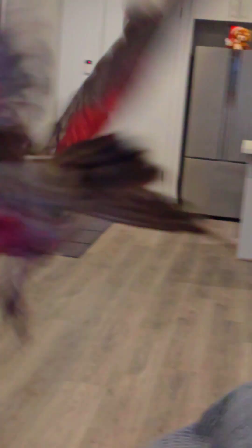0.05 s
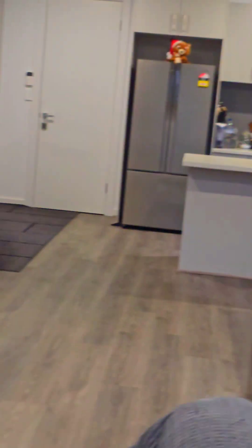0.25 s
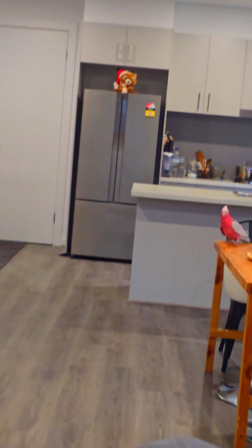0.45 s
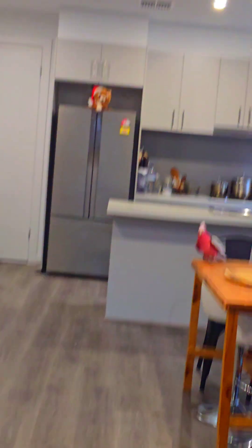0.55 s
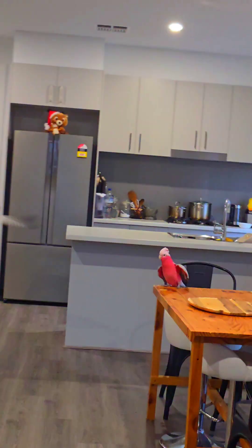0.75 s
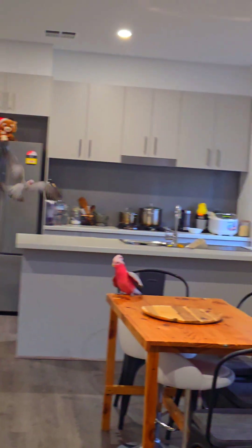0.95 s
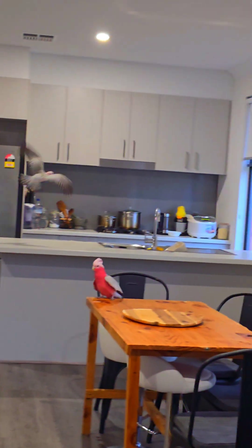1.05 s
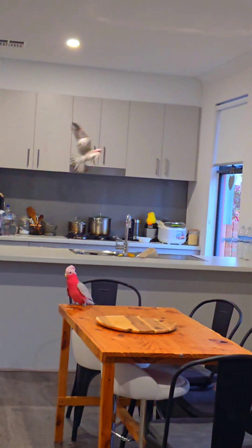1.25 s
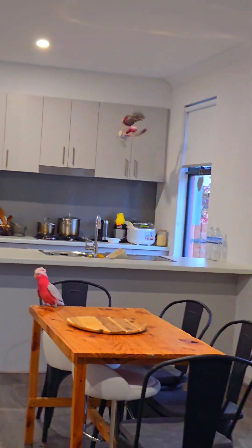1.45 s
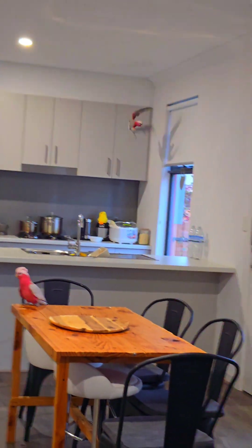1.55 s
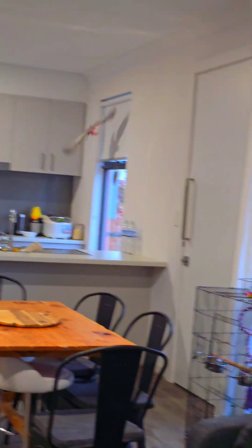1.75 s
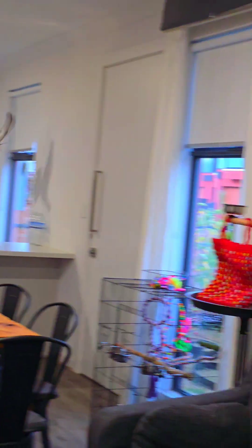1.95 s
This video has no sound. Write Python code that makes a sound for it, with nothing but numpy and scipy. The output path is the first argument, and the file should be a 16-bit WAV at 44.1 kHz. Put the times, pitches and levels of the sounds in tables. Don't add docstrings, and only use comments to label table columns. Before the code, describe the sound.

Two cockatoos shriek piercing, whistling calls in a reverberant kitchen as one takes off close by

```python
import sys
import numpy as np
from scipy import signal
from scipy.fft import rfft, irfft
from scipy.io import wavfile
from scipy.ndimage import uniform_filter1d, minimum_filter1d

SR = 44100
rng = np.random.default_rng(int(sys.argv[2]) if len(sys.argv) > 2 else 0)


def dump(signal):
    limited = np.clip(np.atleast_2d(signal).T, -1, 1)
    pcm = np.round(limited * 32767).astype(np.int16)
    wavfile.write(sys.argv[1], SR, pcm)


def makeup_ratio(level_db):
    decades = np.asarray(level_db, float) / 20
    return 10 ** decades


N = 88200
LEAD = SR // 5
LONG = N + LEAD
TIME_S = (np.arange(LONG) - LEAD) / SR
SIDES = np.array([[.5], [-.5]])


def evened(x):
    return x / np.sqrt(np.mean(x ** 2) + 1e-20)


def read(points, hz):
    f, value = np.transpose(points)
    return np.interp(np.log(hz + 1), np.log(f + 1), value)


def add(mix, start_s, sound):
    part = mix[LEAD + round(start_s * SR):][:len(sound)]
    part += sound[:len(part)]


def noise(colour, channels):
    hz = np.fft.rfftfreq(LONG, 1 / SR)
    white = rng.standard_normal((channels, LONG))
    return evened(irfft(rfft(white) * makeup_ratio(read(colour, hz)), LONG))


def drift(grain_s):
    size = max(round(grain_s * SR), 2)
    once = uniform_filter1d(rng.standard_normal(LONG), size)
    return evened(uniform_filter1d(once, size))


def shape(length_s, rise_s=.009, fall_s=.008):
    t = np.arange(0, length_s + fall_s, 1 / SR)
    ramp = np.minimum(t / rise_s, (t[-1] - t) / fall_s)
    return np.sin(np.pi / 2 * np.clip(ramp, 0, 1)) ** 2


def swell(middle_s, length_s):
    return np.exp(-2 * (TIME_S - middle_s) ** 2 / (length_s / 2) ** 2)


def puffs(events):
    out = np.zeros(LONG)
    for start_s, length_s, db in events:
        add(out, start_s, makeup_ratio(db) * shape(length_s))
    return out


def voice(notes, overtones_db, wobble=.015):
    bend, dulling_db, shimmer, tremble_s = 0.676, -1.5, .5, .003
    out, sway, flicker = np.zeros(LONG), drift(tremble_s), drift(tremble_s)
    for start_s, length_s, first_hz, last_hz, db in notes:
        env = shape(length_s)
        at = LEAD + round(start_s * SR) + np.arange(len(env))
        along = np.linspace(0, 1, len(env))
        glide_hz = first_hz + (last_hz - first_hz) * along ** bend
        phase = 2 * np.pi * np.cumsum(glide_hz * (1 + wobble * sway[at])) / SR
        tone = np.zeros(len(env))
        for k, overtone_db in enumerate(overtones_db):
            tone += makeup_ratio(overtone_db + k * dulling_db * along) * np.sin((k + 1) * phase)
        add(out, start_s, makeup_ratio(db) * env * (1 + shimmer * flicker[at]) * tone)
    return out


# start in seconds, length in seconds, first pitch in Hz, last pitch in Hz, level in dB.
PERCHED = [(-.12, 0.049, 3880, 4070, -38), (.234, 0.068, 4886, 4919, -17.5), (.3, 0.049, 4930, 4884, -33),
           (.422, 0.056, 3400, 3767, -21.5), (.456, 0.018, 5120, 5240, -21.5),
           (.478, 0.052, 4840, 4736, -19), (.512, 0.024, 4800, 5000, -22.5),
           (.543, 0.029, 4900, 4960, -18.5), (.566, 0.0376, 4990, 5070, -20),
           (.706, 0.029, 3503, 3818, -20), (.734, 0.036, 3830, 4090, -12.5), (.775, 0.047, 4800, 4880, -14),
           (.822, 0.041, 4880, 4992, -16), (1.032, 0.0362, 3620, 3880, -17.5),
           (1.066, 0.051, 3860, 4000, -15.5), (1.511, 0.016, 3688, 3860, -19.5),
           (1.52, 0.029, 3810, 3875, -13.5), (1.557, 0.053, 3887, 4228, -18.5),
           (1.57, 0.022, 5135, 5137, -23), (1.61, 0.043, 5158, 5070, -31.5)]
PERCHED_OVERTONES = [1, -12, -21.5, -29]


def perched_whistles():
    return voice(PERCHED, PERCHED_OVERTONES)


# start in seconds, length in seconds, level in dB.
RASPS = [
    (0.134, 0.03, -13.5),
    (0.194, 0.067, -27.5),
    (0.401, 0.1023, -24.5),
    (0.493, 0.2, -37.5),
    (0.672, 0.12, -29),
    (0.797, 0.085, -37.5),
    (0.993, 0.0525, -33),
    (1.086, 0.056, -44),
    (1.464, 0.057, -29.5),
    (1.54, 0.051, -29),
]
# frequency in Hz, level in dB.
RASP_COLOUR = [(500, -13), (1400, -15.5), (2000, -19.5), (2650, -7), (3200, 5), (4600, 3), (6300, -2.5),
               (9500, -4), (10900, -31), (12200, -16), (13600, -22), (15000, -19.5)]


def rasps():
    breath = np.zeros(LONG)
    for start_s, length_s, db in RASPS:
        add(breath, start_s, makeup_ratio(db) * shape(length_s, rise_s=0.047))
    grit = makeup_ratio(2.4 * drift(0.00054))
    return breath * noise(RASP_COLOUR, channels=1)[0] * grit


# start in seconds, length in seconds, first pitch in Hz, last pitch in Hz, level in dB.
FLYING = [(-.12, 0.053, 4940, 4870, -36.5), (-.09, 0.024, 6110, 6300, -32.5),
          (.195, 0.019, 3038, 3136, -11), (.445, 0.019, 2814, 2970, -25), (.555, 0.074, 2883, 3070, -35),
          (.65, 0.027, 3900, 4080, -29), (.71, 0.013, 2780, 3120, -27.5), (.79, 0.035, 5430, 5330, -29),
          (.71, 0.03, 4475, 4630, -28.5), (1.022, 0.0578, 2930, 3110, -29.5),
          (1.484, 0.024, 2700, 3080, -27.5), (1.503, 0.03, 3000, 3271, -17.5),
          (1.535, 0.0607, 3171, 3062, -25.5), (1.478, 0.016, 2990, 3480, -29.5),
          (1.488, 0.039, 5000, 5600, -40.5), (1.07, 0.048, 3080, 3120, -37.5)]
FLYING_OVERTONES = [1, -10, -12, -19]


def flying_whistles():
    return voice(FLYING, FLYING_OVERTONES)


# start in seconds, length in seconds, first pitch in Hz, last pitch in Hz, level in dB.
FIRST_CRY = [
    (.15, 0.0092, 4000, 3720, -26.5),
    (.158, 0.043, 3520, 3730, -12),
    (.2, 0.0331, 3700, 3950, -11.5),
]
FIRST_CRY_OVERTONES = [1, -8.5, -22, -28]


def first_cry():
    return voice(FIRST_CRY, FIRST_CRY_OVERTONES, wobble=.018)


# start in seconds, length in seconds, first pitch in Hz, last pitch in Hz, level in dB.
SCREECHES = [(.228, 0.017, 4050, 4760, -14), (.25, 0.087, 3844, 4098, -19.5),
             (.455, 0.021, 3245, 3440, -35), (.474, 0.017, 3800, 4177, -14), (.495, 0.021, 3980, 4320, -32),
             (.512, 0.027, 4250, 4470, -18.5), (.5, 0.036, 3510, 3810, -38), (.55, .03, 3750, 3900, -25),
             (.545, 0.054, 4260, 4840, -27), (.785, 0.043, 4102, 4166, -21),
             (1.095, 0.024, 4250, 4280, -25)]
SCREECH_OVERTONES = [3, -10, -22, -38]


def screeches():
    return voice(SCREECHES, SCREECH_OVERTONES, wobble=.03)


# start in seconds, length in seconds, pitch in Hz, level in dB.
CLUCKS = [(-.1, 0.083, 739.4, -47.5), (0.135, 0.016, 686.5, -41), (.298, 0.014, 731, -30),
          (0.41, 0.011, 583, -35), (0.564, 0.0373, 742.7, -30), (0.681, 0.057, 658, -43),
          (0.85, 0.051, 737.8, -37.5), (0.929, 0.032, 775, -47.5), (1.002, 0.032, 635.3, -44.5),
          (1.458, 0.027, 519, -45.5), (1.603, 0.075, 819, -50.5)]
CLUCK_PARTIALS = [-5, 0, -4, 0]
# frequency in Hz, level in dB.
THROAT = [(300, -12.5), (700, -9.5), (1000, -6), (1400, -0.5), (1900, -1.5), (3500, -14.5)]


def clucks():
    notes = [(start_s, length_s, hz, hz, db) for start_s, length_s, hz, db in CLUCKS]
    air = puffs([(start_s, length_s, db - 3) for start_s, length_s, _, db in CLUCKS])
    return voice(notes, CLUCK_PARTIALS, wobble=.03) + air * noise(THROAT, channels=1)[0]


# start in seconds, length in seconds, level in dB.
THUMP = (0.1373, .018, -30)
# frequency in Hz, level in dB.
THUMP_TONE = [(180, -45.5), (300, -7), (525, -11.5), (701, 2), (903, -18.5), (1320, 2), (1600, -10),
              (2330, -27), (2600, -31), (3380, -48), (5720, -120)]


def cluck_thump():
    colour = [(100, -60)] + THUMP_TONE + [(4000, -60)]
    return puffs([THUMP]) * noise(colour, channels=1)[0]


# middle in seconds, length in seconds, level in dB, left-right difference in dB, sharpness in dB.
GUSTS = [(0.082, 0.17, -36, 3, -8), (0.19, 0.19, -38.5, -1, -4.5), (0.244, 0.018, -25.5, -17.5, 4),
         (0.276, 0.16, -32, -20, -21), (0.289, 0.054, -23.5, -13.5, 1.5), (0.386, 0.16, -38, 2, -4.5),
         (0.586, 0.15, -38.5, 1, -5), (0.676, 0.039, -32.5, -6, -9.5), (0.733, 0.11, -35, -15.5, -19.5),
         (0.834, 0.07, -37.5, -8.5, 1), (0.908, 0.17, -49.5, 35, -18), (1.29, 0.12, -69, 18, -11),
         (1.453, 0.091, -56.5, 10.5, 2.5), (1.703, 0.52, -49.5, 2, 7), (1.902, 0.042, -52, 9, -15)]
# frequency in Hz, level in dB.
DEEP_PUSH = [(15, -53), (30, 6), (45, 13), (70, -1), (110, -2.5), (200, -38.5)]
# frequency in Hz, level in dB.
FLUTTER = [(40, -3), (100, 1), (250, -2.5), (500, -13.5), (1000, -20.5), (2000, -98), (4000, -82)]


def wing_wash():
    push, edge = np.zeros((2, LONG)), np.zeros((2, LONG))
    for middle_s, length_s, db, pan_db, sharpness_db in GUSTS:
        gust = swell(middle_s, length_s) * makeup_ratio(db + pan_db * SIDES)
        push += gust
        edge += gust * makeup_ratio(sharpness_db)
    deep = noise(DEEP_PUSH, channels=2)
    lumps = makeup_ratio(4.5 * np.array([drift(0.0055), drift(0.01)]))
    flutter = evened(lumps * noise(FLUTTER, channels=2))
    return push * evened(deep + deep[::-1]) + edge * flutter


# frequency in Hz, level in dB.
FEATHERS = [(180, -19), (300, -5.5), (685, -19.5), (1120, -20), (6360, -27), (7880, -36), (15500, -30)]


def feather_swish():
    return makeup_ratio(-43.5) * swell(middle_s=.085, length_s=.16) * noise(FEATHERS, channels=2)


# frequency in Hz, 60 dB decay time in seconds.
ROOM = [(300, 0.37), (1300, 0.9), (3500, 0.66), (6000, 0.57), (9000, 0.51), (15000, 0.15)]


def kitchen(x, wet_db, pan_db, lag, near_db=0):
    early_db, early_s = 11.5, 0.012
    tail_pan_db = 1.5
    taps = np.zeros((2, SR))
    slots = np.arange(160, SR - 20, 20)
    at = slots + rng.integers(0, 20, (2, len(slots)))
    np.put_along_axis(taps, at, rng.choice([-1., 1.], at.shape), 1)
    hz, t, bands = signal.stft(taps, SR, nperseg=256)
    decay_db = early_db * np.exp(-t / early_s) - 60 * t / read(ROOM, hz)[:, None]
    tail = signal.istft(bands * makeup_ratio(decay_db), SR, nperseg=256)[1]
    wet = signal.fftconvolve(x[None], tail / np.linalg.norm(tail[0]), axes=1)[:, :LONG]
    direct = np.array([x, np.roll(x, lag)]) * makeup_ratio(near_db + pan_db * SIDES)
    return direct + makeup_ratio(wet_db + tail_pan_db * SIDES) * wet


# frequency in Hz, level in dB.
FLOOR = [(15, -14), (45, 0.5), (200, -9), (500, -20), (2500, -32.5), (4000, -15.5), (7000, -40.5),
         (15500, -41.5)]


def room_floor():
    same = .8
    left, other = noise(FLOOR, channels=2)
    right = same * left + np.sqrt(1 - same ** 2) * other
    return makeup_ratio(-48.5) * np.array([left, right])


# time in seconds, level in dB.
FLY_OFF = [(.14, 8), (.22, -1.5), (.28, 2.5), (.7, -0.5)]


def scene():
    perched = perched_whistles() + rasps()
    flying = flying_whistles() + first_cry() + screeches() + clucks() + cluck_thump()
    near_db = np.interp(TIME_S, *np.transpose(FLY_OFF))
    mix = kitchen(perched, wet_db=3.5, pan_db=5, lag=2)
    mix += kitchen(flying, wet_db=-0.5, pan_db=5, lag=3, near_db=near_db)
    mix += wing_wash() + feather_swish() + room_floor()
    return mix[:, LEAD:]


def top_cut(x):
    return signal.sosfilt(signal.butter(12, 15670, fs=SR, output="sos"), x)


# frequency in Hz, left-right difference in dB.
PORT_LEAN = [(300, -1), (1200, -3), (2600, -2.5), (5500, 4.5), (8000, 1), (15000, -5.5)]


def record(dry):
    ceiling = .84
    hz = np.fft.rfftfreq(N, 1 / SR)
    heard = irfft(rfft(dry) * makeup_ratio(read(PORT_LEAN, hz) * SIDES) * (hz < 15640), N)
    over_db = 20 * np.log10(abs(heard).max(0) / ceiling + 1e-9)
    peak_db = -minimum_filter1d(-over_db, size=600)
    held = heard / makeup_ratio(np.maximum(uniform_filter1d(peak_db, size=300), 0))
    return top_cut(held)


dry = scene()
out = record(dry)
dump(out)
```